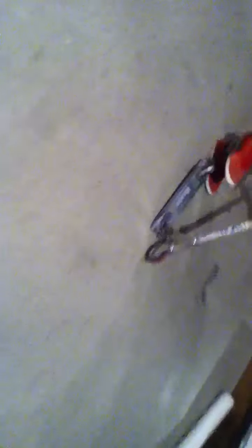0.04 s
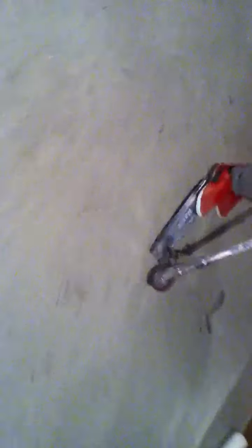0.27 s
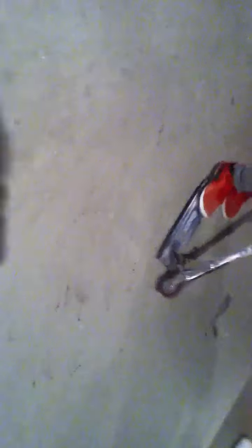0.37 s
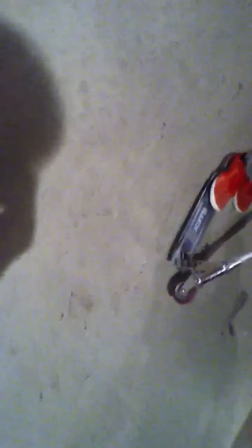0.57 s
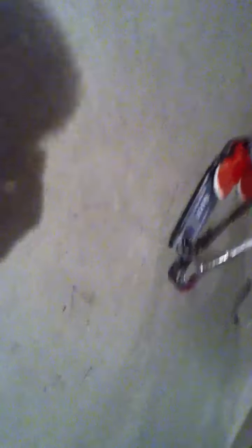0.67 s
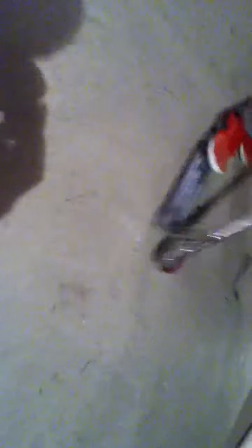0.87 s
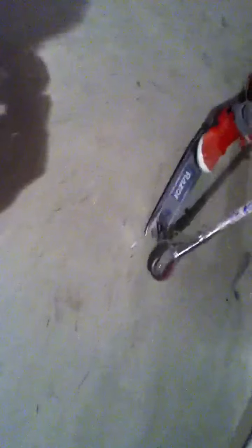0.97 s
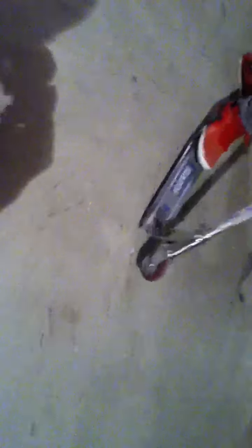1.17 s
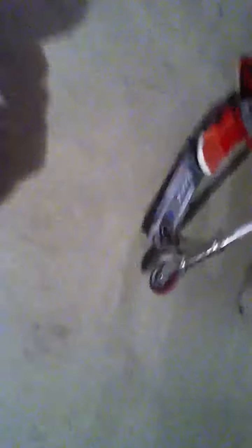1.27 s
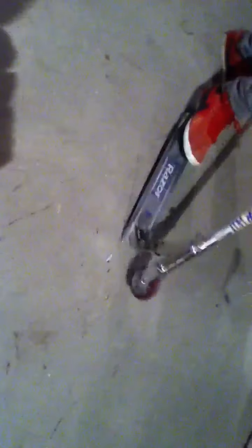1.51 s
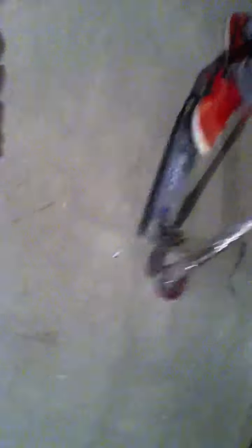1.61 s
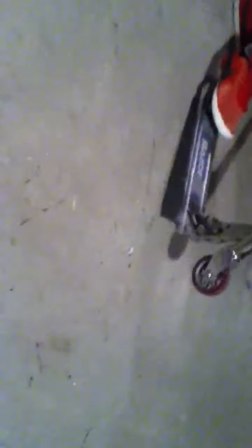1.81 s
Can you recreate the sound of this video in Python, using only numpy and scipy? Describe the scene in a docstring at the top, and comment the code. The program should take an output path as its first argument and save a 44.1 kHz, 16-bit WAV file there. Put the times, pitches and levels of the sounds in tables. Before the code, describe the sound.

Loose metal scooter joint clacks sharply in three flops on bare concrete, ringing in a hard room

```python
"""A folding scooter with a failed joint flops three times on a bare concrete floor, a step or two from a phone.
Each flop is a cluster of short metal clacks, noise bursts that excite the resonances of the frame. Decaying
sines give the soft thuds and a few clear metal pings; grainy noise gives the scrape of the loose joint.
A hard bare room answers with a bright noise-built tail, over hiss, faint steady tones and a low shuffle.
The phone rounds the loudest blows."""
import sys
import numpy as np
from scipy import signal
from scipy.fft import rfft, irfft
from scipy.io import wavfile
from scipy.ndimage import uniform_filter1d

SR = 44100
rng = np.random.default_rng(int(sys.argv[2]) if len(sys.argv) > 2 else 0)


def unload_wav(signal):
    """Save mono or channel-first audio to the path in sys.argv[1] as 16-bit WAV at rate SR, clipped to [-1, 1]."""
    wavfile.write(
        sys.argv[1],
        SR,
        np.round(np.clip(np.atleast_2d(signal).T, -1, 1) * 32767).astype(np.int16),
    )


N = 81585


def undb(db):
    """Level definition: 20 dB is a factor of ten in amplitude."""
    return 10 ** (np.asarray(db) / 20)


def colour(x, hz, db):
    """Linear filtering: gain points in dB are joined on a log-frequency axis."""
    f = np.fft.rfftfreq(len(x), 1 / SR) + 1  # the added 1 Hz avoids log(0)
    gain = undb(np.interp(np.log(f), np.log(hz), db))
    return irfft(rfft(x) * gain, len(x))


def resonate(x, hz, width_hz):
    """Resonance: a second-order peak with gain 1 at its centre."""
    return signal.lfilter(*signal.iirpeak(hz, hz / width_hz, fs=SR), x)


def add(out, sound, at_s):
    """Superposition: mixes a sound in at a time."""
    i = int(at_s * SR)
    out[i:i + len(sound)] += sound[:len(out) - i]


def clacks():
    """Impact noise: each blow is milliseconds of chattering contact; rows are direct sound and room send."""
    # Centres of the clack colour [Hz]
    band_hz = (300, 600, 1000, 1700, 2800, 4300, 6200, 8500, 12000, 16000)
    # Blows: (time [s], level at 300, 600, 1000, 1700, 2800, 4300, 6200, 8500, 12000 Hz [dB],
    # chatter decay time [ms], room send [dB])
    blows = [(0.042, -54, -35, -44, -39, -34.5, -47, -42, -47, -52, 2.13, 0.5),
             (0.1235, -56, -39, -48, -44.0, -35, -34, -51.0, -52, -64, 4.3, -2),
             (0.1755, -58, -50, -51, -40, -27, -31.5, -39.5, -41, -71.0, 2.7, -4),
             (0.2035, -40, -59, -19, -12, -50, -37, -25, -18, -40.0, 3, 4.5),
             (0.2172, -56, -36, -26, -16, -15.5, -17.5, -22, -12.5, -27, 4.6, -15.5),
             (0.2218, -26, -16, -52, -26, -6.5, -11, -29.5, -14, -47, 3.6, -0.5),
             (0.2295, -25, -29.5, -31, -29, -15, -7, -12.5, -16.5, -24, 3.5, -3),
             (0.2378, -70, -3.5, -31, -10, -39, -37, -26, -32, -46, 1.65, -6),
             (0.2455, -51, -40.5, -46, -33, -24.5, -38, -32, -39.0, -47.0, 2.4, -21.5),
             (0.2672, -13.5, -18, -7.5, -39, -25.5, -11.5, -22, -33, -36.0, 3.07, 5),
             (0.2703, -22, -5, -16, -11, -0.5, 0, -3, -5.5, -8.5, 2.27, -1.5),
             (0.2897, -57, -38.5, -10.5, 2.5, -22, -16, -10, -3, -26.5, 4.2, -4.5),
             (0.64, -62.5, -23, -45.5, -44, -51.5, -54, -61.5, -65, -79.0, 2.14, -6),
             (0.739, -53.5, -55.5, -48.5, -55.0, -66, -71, -68.5, -67, -81.5, 1.2, -1.0),
             (0.765, -56.5, -51, -62, -57, -63.0, -63.5, -67.5, -66, -71.5, 2.7, 4),
             (0.897, -49, -57.5, -53, -47, -53.5, -62, -60.5, -62, -80, 3.2, -5.5),
             (0.918, -52, -45, -35, -34, -45.5, -37.5, -49.5, -43, -56.5, 4.1, -2.5),
             (0.9695, -54, -43.5, -30, -50.5, -25, -51, -28, -27, -42, 2.3, 7.5),
             (0.9765, -41, -23, -28, -24.0, -19, -31, -31, -29, -60.0, 1.6, 4),
             (0.982, -40, -29, -57, -47, -30, -33.5, -19, -22.5, -39, 2.3, -8.5),
             (0.999, -34, -23, -39, -25, -31, -44.5, -65.5, -19, -31, 3.2, 3),
             (1.0118, -13.5, -42.5, -56, -38, -46.5, -5.5, -43.5, -9.5, -32, 2.4, 4),
             (1.0172, -18, -19.5, -20, -5.5, -6.5, 0.5, -2, -6.5, -19.5, 2.84, 0.5),
             (1.032, -30, -28, -44, -43, -17.5, -39, -38, -25, -42, 2.6, -12),
             (1.041, -41, -32, -33, -35, -50, -9, -29, -30, -39, 2.1, 5.5),
             (1.495, -33, -32, -62, -41, -33, -41.0, -42, -35, -49, 4.5, -19),
             (1.448, -29, -34, -47, -65, -65, -66.0, -69.5, -66.5, -81, 4.9, 2),
             (1.5082, -36, -45.5, -16.5, -14, -20, -18, -30.5, -36, -51, 3.4, -1.5),
             (1.5312, -53, -56.5, -32.5, -23.5, -23, -11, -0.5, 4.5, -15.5, 1.93, -9.5),
             (1.5385, -56, -47, -15, -39, -18.5, -6, -11, -12, -37.0, 2.3, 4.5),
             (1.5612, -10.5, -11, -13, -1.0, -2, -4, -36, -11, -15, 3.56, -7),
             (1.5762, -34, -19, -21, -7.5, -15, -5, -12, -8, -18, 4.7, -31)]
    rise_ms, stop_power = 0.29, 0.94  # stop_power is the exponent of the stretched decay
    reswell_ms, reswell_db = 2.4, -7  # each blow swells again, weaker, a moment later
    top_drop_db = -16.5  # 16000 Hz relative to 12000 Hz
    t, lead = np.arange(2048) / SR, 256  # lead: samples of room ahead of the blow for the filter
    hits = np.zeros((2, N))
    noises = rng.standard_normal((len(blows), len(t)))
    for (s, *bands, decay_ms, send_db), noise in zip(blows, noises):
        decay = np.exp(-(t * 1000 / decay_ms) ** stop_power)
        shape = decay * (1 - np.exp(-t * 1000 / rise_ms))
        shape = shape + undb(reswell_db) * np.roll(shape, int(reswell_ms * SR / 1000))
        burst = rfft(np.roll(noise * shape, lead))
        # Dividing by the smoothed power evens out the spectrum
        smooth_power = uniform_filter1d(abs(burst) ** 2, size=25)
        burst = burst * np.sqrt(np.sum(shape ** 2) / smooth_power)
        blow = colour(irfft(burst), band_hz, np.r_[bands, bands[-1] + top_drop_db])
        add(hits[0], blow, s - lead / SR)
        add(hits[1], blow * undb(send_db), s - lead / SR)
    return hits


def frame(x):
    """Modal resonance: contact noise plus the short rings it excites in deck and tube."""
    # Frame modes: (frequency [Hz], width [Hz], relative level [dB])
    modes = [(502, 115, 3), (930, 130, -1.5), (1548, 330, 2), (1968, 91, 7), (2764, 420, -1),
             (3510, 240, -9), (4460, 300, -17), (1905, 103, -5), (7135, 95, -11), (4560, 120, -8.5),
             (6170, 550, -5.5), (7770, 83, 2)]
    ring_db = -3.5
    rings = sum(undb(db) * resonate(x, hz, width) for hz, width, db in modes)
    return x + undb(ring_db) * rings


def thuds():
    """Damped oscillation: wheel and shoe meet the floor with a short dull note."""
    # Floor contacts: (time [s], level [dB], pitch [Hz])
    contacts = [(.196, -38.5, 273), (0.2672, -33.5, 130), (.267, -31.5, 306.3), (.637, -44.5, 643),
                (.751, -50, 480), (0.862, -45.5, 248), (1.02, -29.5, 224), (1.029, -33.5, 479),
                (1.07, -37, 254), (1.105, -35, 205), (1.164, -40, 245), (1.187, -36, 229), (1.51, -32, 531),
                (1.562, -22, 226), (1.564, -29, 481), (1.644, -36, 261), (1.704, -39.5, 250),
                (1.728, -39, 242), (1.747, -47, 272)]
    t60_s, rise_s = 0.064, 0.0032
    t, out = np.arange(4096) / SR, np.zeros(N)
    shape = undb(-60 * t / t60_s) * np.minimum(t / rise_s, 1)
    for s, db, hz in contacts:
        add(out, undb(db) * np.sin(2 * np.pi * hz * t) * shape, s)
    return out


def pings():
    """Free vibration of one mode: a loose metal part rings on one note clear of the rattle."""
    # Metal notes: (time [s], starting level [dB], pitch [Hz], t60 [s])
    notes = [(0.983, -30.5, 4164, .12), (.982, -28, 6130, 0.033), (1.0395, -21, 4480, .05),
             (1.509, -20.5, 1820, 0.05), (1.533, -14, 5770, 0.048), (1.5387, -15, 5930, .05)]
    t, out = np.arange(8192) / SR, np.zeros(N)
    for s, db, hz, t60 in notes:
        add(out, undb(db - 60 * t / t60) * np.sin(2 * np.pi * hz * t), s)
    return out


def scrape():
    """Friction noise: the loose joint grinds around each flop in dense grains of uneven size."""
    # Course of the grinding: (time [s], level [dB])
    course = [(.08, -67), (.13, -55.5), (0.196, -48.5), (0.212, -28.5), (.26, -49), (.28, -44.5),
              (.86, -88), (0.912, -53.5), (0.961, -67), (0.979, -38), (1.01, -42), (1.03, -65.5),
              (1.485, -90.5), (1.501, -46), (1.53, -65), (1.55, -86)]
    # Colour of the grinding: (frequency [Hz], relative level [dB])
    tint = [(300, -25), (1000, -4), (2000, -8), (4000, -2.5), (8000, -14.5), (14000, -30)]
    grain_db = 4  # mean of the random boost of a grain
    grains = rng.standard_normal(N) * undb(grain_db * rng.exponential(size=N))
    x = colour(grains, *np.array(tint).T)
    return x / x.std() * undb(np.interp(np.arange(N) / SR, *np.array(course).T))


def room(x):
    """Reverberation: convolution with dense echoes that swell in, then die at a rate set by frequency."""
    # Reverberation time: (frequency [Hz], t60 [s])
    decay_times = [(100, 0.14), (260, 0.73), (700, 0.8), (1840, 0.69), (4850, 0.58), (12800, 0.31)]
    # Colour of the tail: (frequency [Hz], relative level [dB])
    tint = [(100, -11), (300, -7), (700, -1), (2000, 0), (5000, -.5), (10000, -1), (15000, 2.5)]
    level_db, delay_s, rise_s = -3, .006, 0.0033
    t, tail = np.arange(SR) / SR, 0
    hz, t60 = np.array(decay_times).T
    for f in 100 * 2 ** np.arange(0, 7.5, .5):  # half-octave steps
        band = resonate(resonate(rng.standard_normal(SR), f, f / 2), f, f / 2)
        band_t60 = np.interp(np.log(f), np.log(hz), t60)
        tail = tail + band * undb(-60 * t / band_t60)
    tail = colour(tail, *np.array(tint).T) * (1 - np.exp(-t / rise_s))
    tail = tail / np.sqrt(np.sum(tail ** 2))  # unit energy
    response = np.r_[np.zeros(int(delay_s * SR)), tail]
    return undb(level_db) * signal.fftconvolve(x, response)[:N]


def background():
    """Stationary noise and pure tones: hiss, faint steady tones and a low shuffle that comes and goes."""
    # Hiss colour: (frequency [Hz], relative spectral level [dB])
    hiss_colour = [(18, -39), (30, -4), (118, -5.5), (210, -22.5), (394, -14.5), (702, -19), (937, -19),
                   (8080, -32), (14800, -40.5), (16000, -40)]
    # Steady tones: (frequency [Hz], rms level [dB])
    steady = [(543.7, -71), (1577, -95), (2751, -86), (3171, -85.5), (4156, -86.5), (14992, -91)]
    # Course of the low shuffling noise: (time [s], level [dB])
    shuffle_course = [(0, -56), (.3, -66), (.5, -71.5), (.85, -66), (.88, -60), (1.05, -53.5), (1.2, -56),
                      (1.26, -71.5), (1.5, -63), (1.6, -44), (1.76, -66), (1.85, -66)]
    hiss_db = -61
    t = np.arange(N) / SR
    hiss = colour(rng.standard_normal(N), *np.array(hiss_colour).T)
    hiss = hiss / hiss.std() * undb(hiss_db)
    low = resonate(resonate(rng.standard_normal(N), 210, 260), 210, 260)
    shuffle = low / low.std() * undb(np.interp(t, *np.array(shuffle_course).T))
    tones = sum(undb(db) * np.sqrt(2) * np.sin(2 * np.pi * hz * t) for hz, db in steady)
    return hiss + shuffle + tones


def scene():
    """Superposition of direct sound, echoes and background."""
    # Bounds of the three flops [s]
    bounds_s = (0, .86, 1.44, 1.85)
    ping_send_db = -10  # share of the pings sent to the room
    struck = frame(clacks() + scrape())
    near, sent = struck + thuds() + pings() * undb([[0], [ping_send_db]])
    t = np.arange(N) / SR
    # Each flop gets a fresh random draw of the same room tail
    echoes = sum(room(sent * (t >= a) * (t < b)) for a, b in zip(bounds_s, bounds_s[1:]))
    return (near + echoes + background())[None]


def record(dry):
    """Band limiting and saturation: the phone drops deep bass, rounds the loudest peaks and cuts the top."""
    low_cut_hz, top_hz = 118, 15900
    clip_at = .71  # amplitude that the rounded peaks approach ahead of the top cut
    x = signal.sosfilt(signal.butter(2, low_cut_hz, "high", fs=SR, output="sos"), dry)
    x = x / (1 + (x / clip_at) ** 4) ** .25
    return signal.sosfilt(signal.ellip(10, .2, 80, top_hz, fs=SR, output="sos"), x)


dry = scene()
out = record(dry)
unload_wav(out)
```